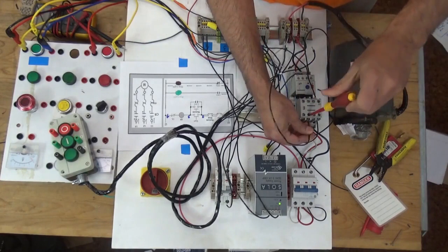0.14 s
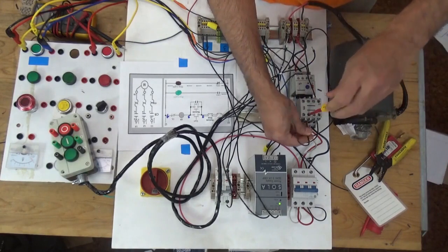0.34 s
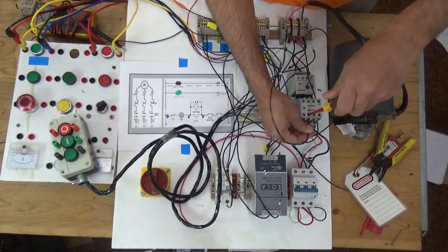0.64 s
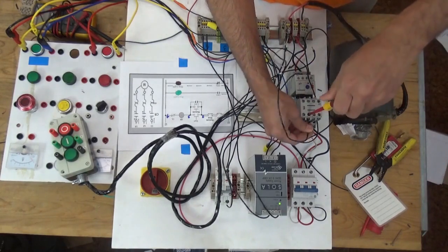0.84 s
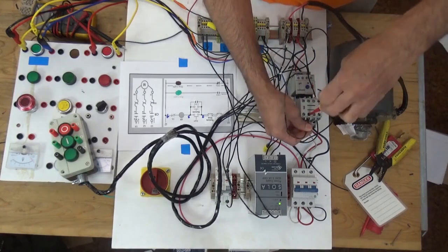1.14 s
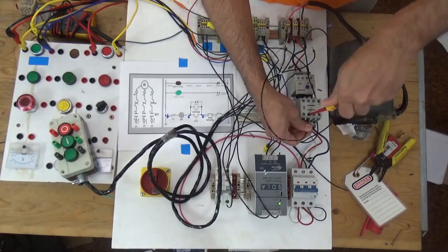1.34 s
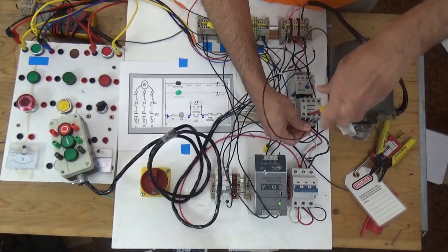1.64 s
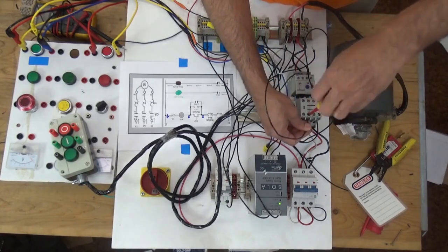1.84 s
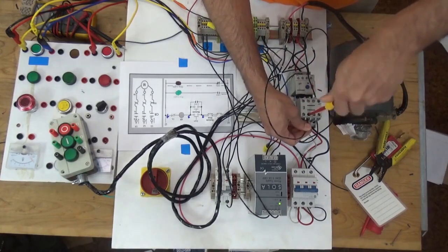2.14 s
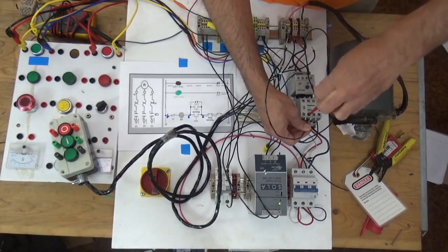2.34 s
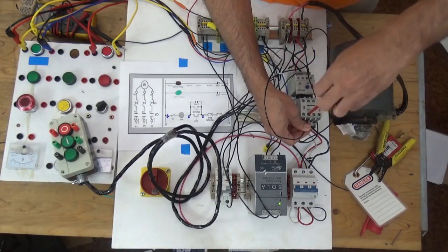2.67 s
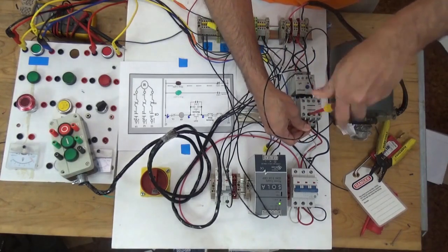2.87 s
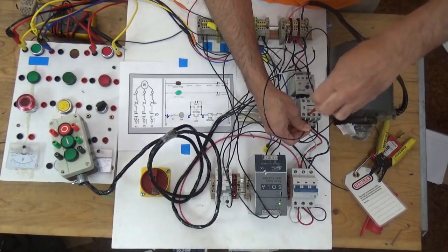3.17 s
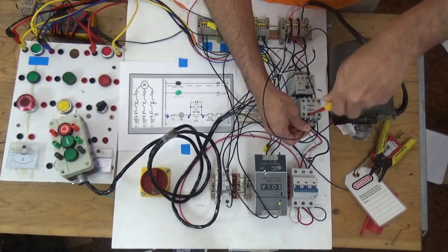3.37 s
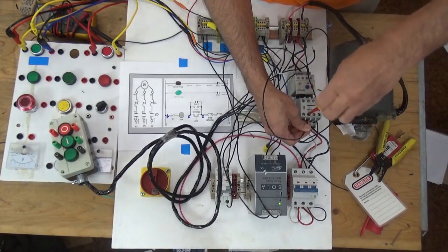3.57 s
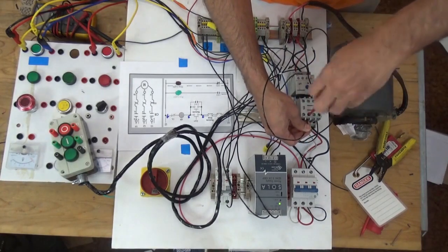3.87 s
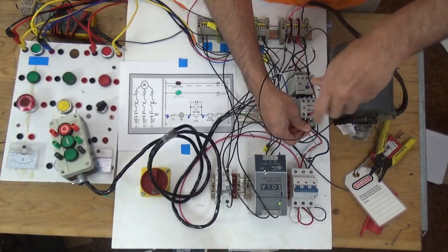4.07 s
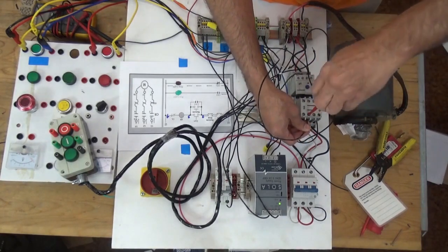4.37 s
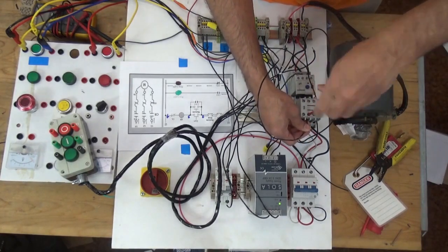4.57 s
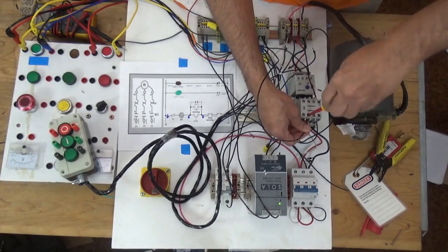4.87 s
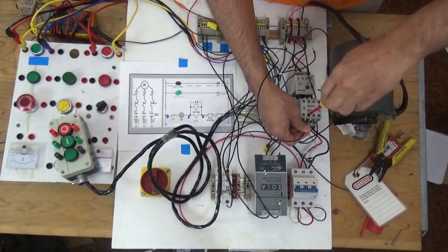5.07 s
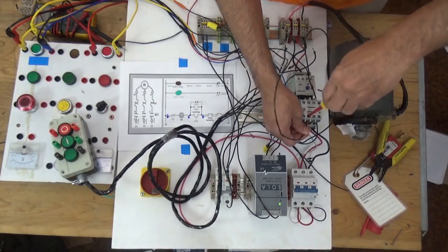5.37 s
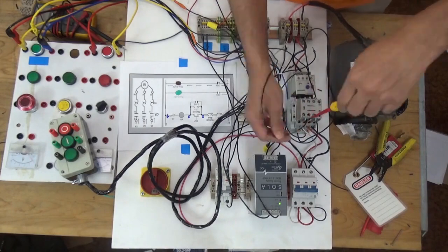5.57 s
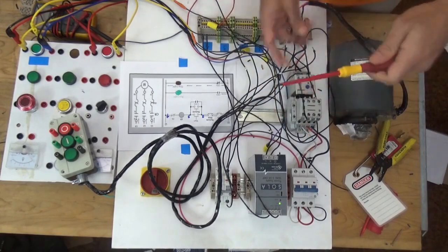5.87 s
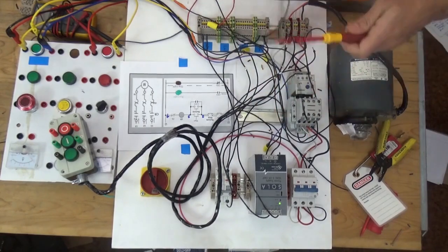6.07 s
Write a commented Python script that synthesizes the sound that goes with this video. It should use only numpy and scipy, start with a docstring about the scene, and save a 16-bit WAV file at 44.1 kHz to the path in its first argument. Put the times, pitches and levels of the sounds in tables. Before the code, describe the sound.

A screwdriver works a terminal on a wooden board in a small, dry room. Two bright clicks come at once, then irregular light ticks, plastic clacks and short gritty scrapes with each wrist twist. Sharper snaps stand out near the end as the blade comes free, followed by faint wire rustle and soft hand rumble. The pickup is fairly near, work slightly right of centre, over still air and very faint hum.

```python
"""In a small, dry workshop a screwdriver tightens a terminal of a plastic contactor on a wooden training board,
while a hand holds the wire. Snaps of noise set housing, panel, rail and board ringing as clicks and knocks.
Grains of filtered noise make the scrape of thread and wire; small ticks come with it.
Then the blade is pulled out and the wires tick and rustle. The hand gives soft thuds and a low rumble.
Behind it lie still air, made of filtered noise, and a faint mains hum of two sines."""
import sys
import numpy as np
from scipy import signal
from scipy.fft import rfft, irfft, next_fast_len
from scipy.io import wavfile
from scipy.ndimage import uniform_filter1d, map_coordinates

SR = 44100
rng = np.random.default_rng(int(sys.argv[2]) if len(sys.argv) > 2 else 0)


def persist_wave(psi):
    """Save psi, clipped to +-1, as 16-bit WAV."""
    counts = np.round(np.clip(psi, -1, 1) * 32767).astype(np.int16)
    wavfile.write(sys.argv[1], SR, np.atleast_2d(counts).T)


N = 274302  # length in samples

# The blade catches or knocks in the terminal. Each row: start in seconds, tick level in dB, then how strong
# the top octave, housing, panel and board are, in dB relative to the tick. contacts() trims all these levels.
BLADE_CONTACTS = [(.1299, -19.5, -10, -12.5, -8.5, -31), (.1406, -17, -6, -7, -11, -8),
                  (.2992, -39.5, -5, -10, -17, -16), (.4249, -43, -14, -6, -17, 0),
                  (.4362, -43.5, -20, -1, -1.5, -5.5), (.5738, -40.5, -17, -4, -10, -3),
                  (.5902, -38, 1, -4, -10, -2.5), (.618, -39, -14, -2, -11.5, -6),
                  (.6434, -40.5, -18, -3, -2, 1.5), (.6948, -43, -7, 0, -22, -10),
                  (.7567, -45, -16, -22, -23, -11), (.851, -42, -14, -13, -26, -27),
                  (.9797, -26.5, -13, -4.5, -22, -12), (1.0522, -35.5, -12, -12, -32, -39),
                  (1.098, -33, -5, -3.5, -22, -38), (1.114, -47, -15, -13, -30, -11),
                  (1.1566, -39, -16, -15, -29, -22), (1.3064, -41, -15, -8, -6, -8),
                  (1.405, -37, -18, 1.5, -16, -12), (1.4415, -31, -14, -8, -3, -1.5),
                  (1.4654, -27, -8, -4.5, -10, -12.5), (1.4884, -29, -17, 2, -11, -6),
                  (1.5558, -26, -11, -20, -21, -25.5), (1.6884, -43.5, -13, -3.5, -7, -7),
                  (1.8169, -36, -11, -16, -27, -26), (1.8291, -27, -15, -10, -13.5, -29),
                  (2.1056, -40, -27, -3.5, -3, 1), (2.2221, -32.5, -20, -5, -6, -10.5),
                  (2.2587, -34, -19, -5, -25, -27), (2.2759, -25, -19.5, -16, -12, -17.5),
                  (2.5194, -37.5, -10, -16, -14, -16), (2.6102, -31.5, -27, -7.5, -10.5, -3),
                  (2.6515, -32, -20, -8.5, -14, -16), (2.7422, -24.5, -11.5, -13, -17.5, -18),
                  (2.9098, -43, -14, -24, -8, -13), (3.034, -31.5, -17, -20, -14, -18),
                  (3.0402, -29, -9, -13.5, -33, -39), (3.1457, -45, -10, -6, 0.5, -4.5),
                  (3.3211, -49, -8, 0.5, -2, 0), (3.4374, -30.5, -11, -1, -13, -15),
                  (3.477, -23.5, -11, -9.5, -16.5, -15), (3.642, -54.5, -16, 2, 7, 8.5),
                  (3.7302, -43, -21, 0.5, -6, -11), (3.8148, -38.5, -10, -4, -12, -1),
                  (3.8291, -35, -12, -5, -2, -9), (3.8748, -30, -17, -2, 1, -2.5),
                  (4.0394, -36.5, -14, -15, -18, -19), (4.1583, -40.5, -14, -9, -9.5, -6.5),
                  (4.2727, -34, -14, -4.5, -9, -4), (4.2979, -44, -28, -5, -8, 4),
                  (4.3415, -25.5, -17, -5, 1.5, -2.5), (4.793, -36.5, -20, -7, -16.5, -11),
                  (4.812, -16.5, -22.5, -12.5, -6.5, -20.5), (4.8817, -37, -15, -23, -23, -27.5),
                  (5.1855, -37.5, -30, 0.5, 1, -1.5), (5.2618, -39.5, -9, -22, -30, -27),
                  (5.2788, -31.5, -7, -15, -25, -28), (5.2889, -34, -14, -17, -28, -33),
                  (5.3242, -36.5, -1, -32, -11, -22), (5.3633, -28.5, -10, -18, -25.5, -19),
                  (5.5377, -15.5, -23, -10.5, -36, -36), (5.655, -38, -7, -10.5, -12, -14),
                  (5.853, -42.5, -19, -2, -13, -9), (5.9213, -40.5, -29, -7, -15, -26),
                  (5.9605, -37.5, -8, -9, -14.5, -8), (6.0186, -38.5, -30, -5, -15, -8),
                  (6.106, -42, -17, -20, -28, -22), (6.1576, -44, -20, 0.5, -7.5, -3.5)]
# Colour of the steel tick. Each row: frequency in Hz, relative level in dB per Hz.
TICK_COLOUR = [(1500, -38.5), (3500, -10.5), (4800, 0), (6200, -0.5), (8000, -3.5), (10000, -7),
               (11500, -19), (15500, -32)]
# Tones of the plastic housing. Each row: frequency in Hz, relative level in dB, time to fade by 60 dB in seconds.
HOUSING_MODES = [(2161, -5.5, 0.053), (2423, 2.5, 0.017), (2874, 7.5, 0.026), (3097, -1, 0.061),
                 (3960, -10, 0.017), (4100, -1.5, 0.0042), (4374, -31, 0.021)]
# Tones of the panel. Each row: frequency in Hz, relative level in dB, time to fade by 60 dB in seconds.
PANEL_MODES = [(1169, -13, 0.14), (1183, -5.5, 0.008), (1375, 15, 0.032), (1508, -1.5, 0.052),
               (1690, 2.5, 0.021), (1774, -3.5, 0.072), (1958, -9.5, 0.0099)]
# Tones of the mounting rail. Each row: frequency in Hz, relative level in dB, time to fade by 60 dB in seconds.
RAIL_MODES = [(670, -3.5, 0.11), (768, 1, 0.075), (808, -14, 0.049), (896, 2, 0.075), (931, -1, 0.072),
              (992, -6, 0.038)]
# Tones of the wooden board, which bumps() plays too.
# Each row: frequency in Hz, relative level in dB, time to fade by 60 dB in seconds.
BOARD_MODES = [(138.4, -16, 0.061), (201.7, -14, 0.096), (260, -10.5, 0.0057), (328, 0, 0.019),
               (374.6, -8, 0.098), (393, -4.5, 0.053), (452, 0.5, 0.076), (544.7, -10.5, 0.052)]
CHATTER_T60_S = 0.015  # time for the chatter of the tip to fade by 60 dB
RAIL_DB = -5.5  # the rail links panel and board: it follows the weaker of the two, offset by this


def contacts(rows):
    """Steel snaps against steel; the blow spreads through housing, panel and mounting rail into the heavy board."""
    out = np.zeros((2, N))
    t = np.arange(SR // 14) / SR
    for s, db, top_db, housing_db, panel_db, board_db in rows:
        # each contact has its own brightness, blended in from 6000 to 8800 Hz
        bright_db = top_db + 14.5
        colour = causal([(hz, level + bright_db * np.clip((hz - 6000) / 2800, 0, 1)) for hz, level in TICK_COLOUR])

        # the tip chatters for a few milliseconds, the first touches hardest
        fading = amp(-60 * t / CHATTER_T60_S) + 0.23 * amp(-60 * t / 0.00041)
        chatter = rng.standard_normal(len(t)) * fading
        tick = amp(db - 12.5) * burst(signal.fftconvolve(chatter, colour)[:len(t)])

        # heavier parts take longer to start ringing
        housing = ring(HOUSING_MODES, t, attack=0.00044, dense_db=2.5, dense_t60=0.02)
        panel = ring(PANEL_MODES, t, attack=0.001, dense_db=7, dense_t60=0.009, count=12)
        rail = ring(RAIL_MODES, t, attack=0.0017, dense_db=1.0, dense_t60=0.044, count=8)
        board = ring(BOARD_MODES, t, attack=0.0046, dense_db=2, dense_t60=0.025, count=12)
        housing *= amp(db + housing_db - 9.5)
        panel *= amp(db + panel_db - 7.5)
        rail *= amp(db + min(panel_db, board_db) + RAIL_DB)
        board *= amp(db + board_db - 3.0)

        click = tick + housing
        knock = panel + rail + board
        stirred = scattered(click, blur_hz=225) + scattered(panel + rail, blur_hz=165) + board
        add(out, s, room(click + knock, wet_db=-6.5, feed=stirred))
    return out


FIRM_DB = -52  # sliding level at which the next two settings hold
SMALL_PER_S, SMALL_DB = 15, -41.5  # ticks per second, and tick level in dB before the trim in contacts()
SMALL_GROWS, SMALL_SPREAD_DB = 0.79, 3  # dB of tick per dB of sliding, and random spread of the ticks
# The mix of a small tick. A single row: top octave, housing, panel and board, in dB relative to the tick
# and before the trims in contacts().
SMALL_TICK_MIX = (-16.5, -14.5, -11, -9.5)


def small_ticks(slide_db, count=400):
    """Thread and wire touch by chance, more often and more strongly the harder they slide; rows for contacts()."""
    when, luck = rng.random((count, 2)).T
    size = rng.standard_normal(count)
    # one chance at a random moment in each of count equal slices of time
    at = ((np.arange(count) + when) * (N - 1) / count).astype(int)
    effort_db = slide_db[at] - FIRM_DB
    chance = SMALL_PER_S * amp(effort_db) * N / SR / count
    happens = luck < chance
    db = SMALL_DB + SMALL_GROWS * effort_db + SMALL_SPREAD_DB * size
    return [(s, level, *SMALL_TICK_MIX) for s, level in zip(at[happens] / SR, db[happens])]


# Scraping strokes, one for each twist of the wrist, then lighter ones as the wires are let go.
# Each row: time when full level is reached in seconds, hold in seconds, level in dB.
WRIST_STROKES = [(.58, 0.062, -56), (.985, 0.049, -55), (1.065, 0.086, -53), (1.455, 0.03, -43.5),
                 (1.835, 0.05, -51.5), (1.99, 0.012, -56.5), (2.23, 0.068, -52.5), (2.615, 0.044, -49),
                 (2.74, 0.0085, -51.5), (3.055, 0.018, -52.5), (3.15, 0.081, -65.5), (3.445, 0.031, -49.5),
                 (3.855, 0.015, -51), (4.265, 0.016, -58), (4.65, 0.017, -59.5), (5.37, 0.021, -58.5),
                 (5.535, 0.038, -49.5), (5.74, 0.013, -60), (5.87, 0.016, -58.5), (6.13, 0.057, -62.5)]


def sliding():
    """How hard thread and wire slide, in dB: quick strokes above a faint creeping."""
    return swells(WRIST_STROKES, rise=598, fall=270, rest_db=-71)


# Colour of the scrape. Each row: frequency in Hz, relative level in dB per Hz.
SCRAPE_COLOUR = [(100, -23), (400, 10.5), (650, 1.5), (1400, 1), (2000, -7.5), (2950, -1), (3700, -9),
                 (4500, -2.5), (5000, 0.5), (5600, 2), (6500, -1), (9800, -3.5), (11500, -17.5),
                 (15500, -34)]
# Colour of the singing blade. Each row: frequency in Hz, relative level in dB per Hz.
BLADE_COLOUR = [(300, -3.5), (1000, -6.5), (2400, -13), (3000, 6), (3500, -5), (4100, 1), (4700, -8),
                (5400, -2), (6800, -11), (8400, -7), (9200, 8), (9900, -8), (10800, -24), (15000, -37)]
# The blade skids on the screw. Each row: time when full level is reached in seconds, hold in seconds, level in dB.
BLADE_SKIDS = [(.342, 0.0088, -44.5)]


def scraping(slide_db):
    """The thread and the wire grate through the terminal in fits and starts; a skid sings in the blade."""
    # the grip takes a new random value every 200 samples, joined by straight lines
    grip = map_coordinates(rng.standard_normal(N // 200 + 4), [np.arange(N) / 200], order=1)
    uneven = slips(rate=1800, spread_db=1) * amp(5.1 * grip)
    grate = unit(filtered(uneven, lambda hz: amp(along(SCRAPE_COLOUR, hz))))
    skid = unit(filtered(slips(rate=6900, spread_db=0.5), lambda hz: amp(along(BLADE_COLOUR, hz))))
    skid_db = swells(BLADE_SKIDS, rise=602, fall=725)
    return room(grate * amp(slide_db) + skid * amp(skid_db), wet_db=-5.5)[:, :N]


# Soft bumps of the hand and the tool handle on the board.
# Each row: start in seconds, level in dB, level of the low thud in dB relative to the ringing wood.
HAND_BUMPS = [(.99, -47, 0), (1.447, -46.5, -13), (2.02, -50, -11), (2.108, -43.5, -27),
              (2.567, -54.5, -12), (2.746, -48, 5), (3.481, -51.5, 5.5), (4.705, -55.5, 3.5),
              (4.816, -46.5, 8), (5.333, -57, 12), (5.539, -50.5, 9.5), (5.584, -46.5, -20),
              (5.869, -48.5, -3)]
# Colour of a soft contact with the board. Each row: frequency in Hz, relative level in dB per Hz.
THUD_COLOUR = [(50, -19), (100, -10.5), (150, -1.5), (240, -3), (420, -4), (600, -9.5), (850, -19),
               (1500, -18.5), (4000, -21), (12000, -74)]
# The hand and the wire bundle shift on the board.
# Each row: time when full level is reached in seconds, hold in seconds, level in dB.
HAND_SHIFTS = [(4.3, .3, -77), (5.32, 0.075, -57), (5.64, 0.064, -60), (5.88, 0.15, -60.5)]


def bumps():
    """The soft hand stirs only the board: single bumps with a low thud, and a lumpy rumble as it shifts."""
    out = np.zeros((2, N))
    t = np.arange(SR // 7) / SR
    flesh = causal(THUD_COLOUR, size=4096)
    for s, db, thud_db in HAND_BUMPS:
        push = rng.standard_normal(len(t)) * t * amp(-60 * t / 0.037)
        thud = amp(thud_db) * burst(signal.fftconvolve(push, flesh)[:len(t)])
        wood = ring(BOARD_MODES, t, attack=0.0051, dense_db=5.0, dense_t60=0.032)
        add(out, s, room(amp(db) * (wood + thud), wet_db=-9.5))
    rumble = unit(filtered(slips(rate=370, spread_db=0.0), lambda hz: amp(along(THUD_COLOUR, hz))))
    # the resting level is the hand lying on the board
    shift_db = swells(HAND_SHIFTS, rise=150, fall=108, rest_db=-70.5)
    return out + room(rumble * amp(shift_db), wet_db=-5)[:, :N]


# Colour of the still air. Each row: frequency in Hz, relative level in dB per Hz.
AIR_COLOUR = [(12, -62), (20, -7), (65, -0.5), (107, -7), (285, -4), (802, -13), (1290, -16.5), (1400, -14),
              (2020, -16.5), (2200, -16.5), (2530, -19), (7950, -22), (8890, -22.5), (13200, -25.5),
              (16000, -29)]
AIR_DB = -62.5  # level of the part of the air noise that both channels share
# Mains hum. Each row: frequency in Hz, rms level in dB.
MAINS_HUM = [(60, -76), (120, -77.5)]


def workshop():
    """Still room air as wide filtered noise, and mains hum as steady sines in the middle."""
    mid, side = unit(filtered(rng.standard_normal((2, N)), lambda hz: amp(along(AIR_COLOUR, hz))))
    width_db = [(40, -25), (250, -10.0), (1000, 2.0), (5000, -5), (12000, -18)]  # (Hz, dB)
    side = filtered(side, lambda hz: amp(along(width_db, hz)))
    t = np.arange(N) / SR
    hum = sum(amp(db) * np.sqrt(2) * np.sin(2 * np.pi * hz * t) for hz, db in MAINS_HUM)
    return amp(AIR_DB) * (mid + np.array([side, -side])) + hum


# How long the room rings. Each row: frequency in Hz, time to fade by 60 dB in seconds.
ROOM_FADE = [(150, 0.24), (450, 0.19), (1100, 0.33), (1700, 0.24), (3000, 0.22), (7000, 0.17),
             (14000, 0.16)]


def room(x, wet_db, feed=None, width=0.19):
    """Direct sound x plus a fresh stereo tail stirred by feed; both channels are nearly the same in the bass."""
    # noise that fades at its own speed in each frequency band
    hz, t, z = signal.stft(rng.standard_normal((2, SR // 4)), SR, nperseg=256)
    tail = signal.istft(z * amp(-60 * t / along(ROOM_FADE, hz)[:, None]), SR, nperseg=256)[1]
    # the tail builds up over a few milliseconds
    tail = tail * (1 - np.exp(-(np.arange(tail.shape[1]) / SR / 0.0037) ** 2))
    mid, side = amp(wet_db) * tail / np.linalg.norm(tail[0])
    spread = [(280, 0.058), (550, 0.45), (1200, 2.0), (4000, 2.27), (12000, 1.35)]  # (Hz, gain)
    side = width * filtered(side, lambda f: along(spread, f))
    source = x if feed is None else feed
    wet = signal.fftconvolve(source[None], np.array([mid + side, mid - side]), axes=1)
    add(wet, 0, x)
    return wet


def ring(modes, t, attack, dense_db, dense_t60, count=26):
    """A few clear modes over a crowd of quickly damped ones, with new strengths for each point of contact."""
    hz, db, t60 = np.transpose(modes)[:, :, None]
    strength, detune, phase = rng.standard_normal((3, len(modes), 1))
    clear_hz = hz * (1 + 0.0091 * detune)
    clear = amp(db + 2 * strength - 60 * t / t60) * np.sin(2 * np.pi * (clear_hz * t + phase))
    even_hz = np.linspace(hz.min(), hz.max(), count)[:, None]
    crowd_hz = even_hz * (1 + 0.028 * rng.standard_normal((count, 1)))
    crowd_gain = amp(np.interp(crowd_hz, hz[:, 0], db[:, 0]))
    crowd = crowd_gain * np.sin(2 * np.pi * (crowd_hz * t + rng.random((count, 1))))
    both = burst(clear.sum(0)) + amp(dense_db) * burst(crowd.sum(0) * amp(-60 * t / dense_t60))
    return burst(both * (1 - np.exp(-(t / attack) ** 2)))


def slips(rate, spread_db):
    """Friction: tiny slips of uneven size at random moments, rate per second on average."""
    happens = rng.random(N) < rate / SR
    return happens * rng.standard_normal(N) * amp(spread_db * rng.standard_normal(N))


def swells(rows, rise, fall, rest_db=-120):
    """Level in dB of movements that rise, hold and fall away (slopes in dB per s) above a resting level."""
    t = np.arange(N) / SR
    each = [db - rise * np.maximum(s - t, 0) - fall * np.maximum(t - s - hold, 0) for s, hold, db in rows]
    return np.maximum(np.max(each, axis=0), rest_db)


def scattered(x, blur_hz, size=2048):
    """What a small part radiates in all directions together: the same energy, with its narrow peaks evened out."""
    hz = np.fft.rfftfreq(size, 1 / SR)
    weights = np.exp(-(np.arange(-60, 61) * hz[1] / blur_hz) ** 2)
    power = np.convolve(np.abs(rfft(x, size)) ** 2, weights / weights.sum(), "same")
    smooth_db = 10 * np.log10(power + 1e-14)
    return np.pad(causal(np.transpose([hz, smooth_db]), size=size), (0, len(x) - size))


def causal(points, size=512):
    """The sharpest impulse response with a given spectrum (minimum phase, by folding the cepstrum)."""
    cep = irfft(np.log(amp(along(points, np.fft.rfftfreq(size, 1 / SR)))))
    cep[1:size // 2] *= 2
    cep[size // 2 + 1:] = 0
    return irfft(np.exp(rfft(cep)))


def filtered(x, response):
    """Filter x by a gain that depends on frequency."""
    m = next_fast_len(x.shape[-1] + 8192)
    return irfft(rfft(x, m) * response(np.fft.rfftfreq(m, 1 / SR)), m)[..., :x.shape[-1]]


def along(points, hz):
    """Read a value between (Hz, value) points on a log frequency axis."""
    f, v = np.transpose(points)
    return np.interp(np.log(hz + 1), np.log(f + 1), v)


def burst(x, size=176):
    """Scale a hit so that its loudest stretch of size samples (about 4 ms) has rms 1."""
    return x / np.sqrt(uniform_filter1d(x ** 2, size, mode="constant").max())


def unit(x):
    """Scale to rms 1."""
    return x / np.sqrt(np.mean(x ** 2) + 1e-20)


def amp(db):
    """Decibels to gain."""
    return 10 ** (np.asarray(db) / 20)


def add(track, s, sound):
    """Mix a sound into a track from time s in seconds."""
    part = track[..., max(round(s * SR), 0):][..., :sound.shape[-1]]
    part += sound[..., :part.shape[-1]]


def scene():
    """The strokes drive both the scraping and the small ticks; the work happens slightly right of centre."""
    slide_db = sliding()
    air = workshop()
    work = contacts(BLADE_CONTACTS) + bumps() + scraping(slide_db) + contacts(small_ticks(slide_db))
    return work * amp([[-.3], [.3]]) + air  # left and right in dB


TOP_HZ = 15950


def record(dry):
    """Keep only what lies below TOP_HZ, with a sharp edge."""
    return filtered(dry, lambda hz: hz < TOP_HZ)


dry = scene()
out = record(dry)
persist_wave(out)
```